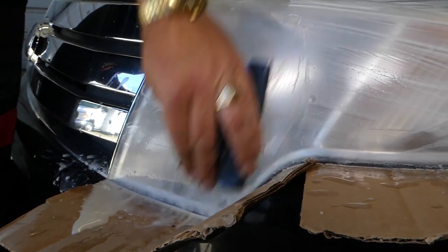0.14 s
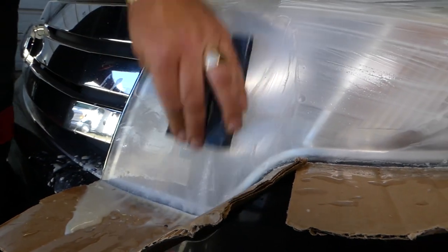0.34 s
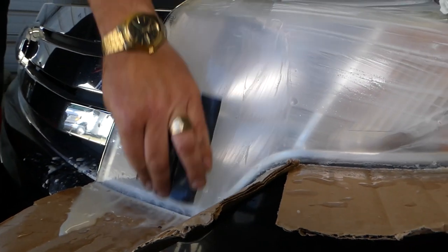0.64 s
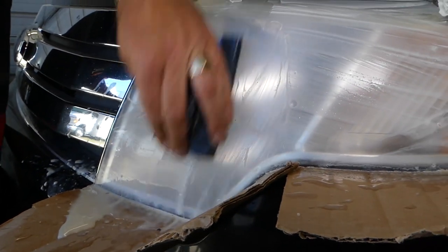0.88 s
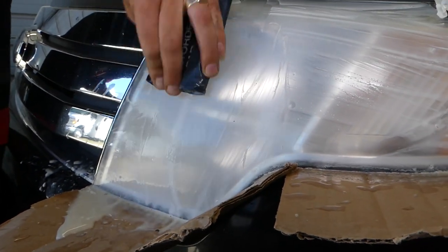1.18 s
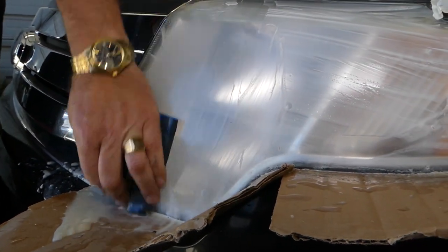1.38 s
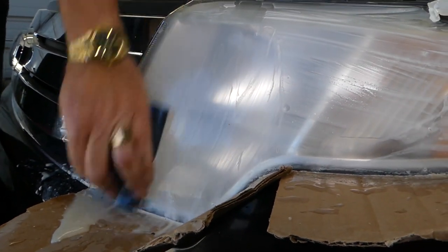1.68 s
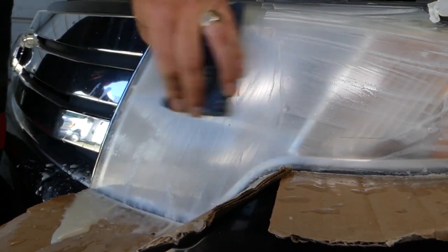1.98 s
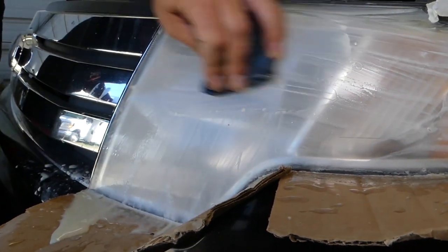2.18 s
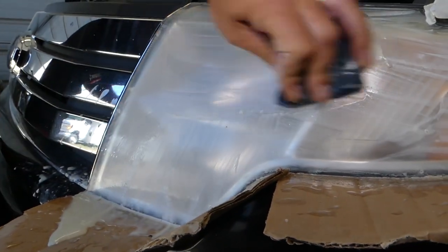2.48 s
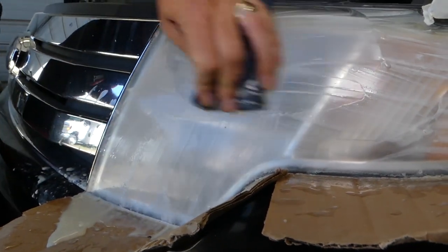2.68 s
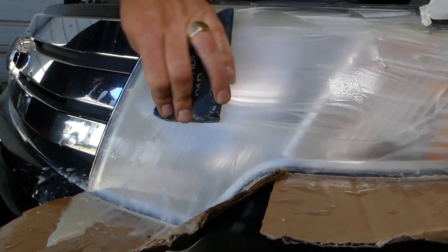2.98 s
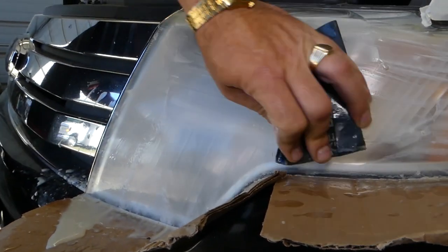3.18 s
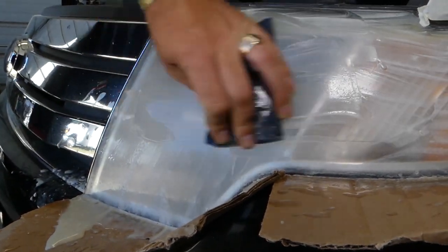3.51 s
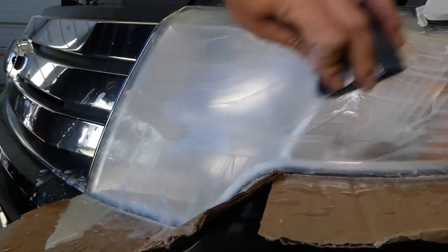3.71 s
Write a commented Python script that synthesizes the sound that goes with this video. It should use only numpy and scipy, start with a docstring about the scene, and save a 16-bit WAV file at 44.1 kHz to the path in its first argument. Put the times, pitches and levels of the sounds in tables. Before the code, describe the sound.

Wet sandpaper rubs a hollow plastic headlamp lens from the start, about five bright, gritty strokes a second, each dipping at the turn. Soft low knocks mark some grips, strongest near 1.7 s; hollow clucks and coarse scrapes come around 1.45 and 1.8 s. A longer stroke spans 1.8-2.2 s, a rough squeak falls at 2.4-2.5 s, and rubbing eases from 3.7 s, stopping near 3.9 s. Close, small workshop, faint steady noise.

```python
"""Wet sanding of a hollow lens

Wet sandpaper is rubbed to and fro by hand over a hollow plastic headlamp lens, about five strokes a second.
Coloured noise grains rasp and hiss with the speed of the hand and sink at each turn, over the lens's body.
Damped modes knock as the pad grips; grain bursts scrape and gliding sines cluck at the rim, and one rough
sine squeaks. Close microphones in a small workshop add a diffuse tail and a steady noise floor."""
import sys
import numpy as np
from scipy import signal
from scipy.fft import rfft, irfft
from scipy.io import wavfile
from scipy.ndimage import uniform_filter1d

SR = 44100
rng = np.random.default_rng(int(sys.argv[2]) if len(sys.argv) > 2 else 0)


def waveform_to_disk(signal):
    """Save audio, clipped to [-1, 1], as 16-bit WAV at the path in sys.argv[1]."""
    frames = np.transpose(np.atleast_2d(signal))
    scaled = np.clip(frames, -1, 1) * 32767
    samples = np.round(scaled).astype(np.int16)
    wavfile.write(sys.argv[1], SR, samples)


N = 169785
T = np.arange(N) / SR  # time [s]
HZ = np.fft.rfftfreq(N, 1 / SR)  # frequency of each spectral bin [Hz]
ONSET_RISE_S = 0.0023  # time constant with which knocks and bites build up


def amp(db):
    """Level to amplitude: 20 dB is a factor of ten."""
    return 10 ** (np.asarray(db) / 20)


def unit(x):
    """Normalisation to a root-mean-square value of 1."""
    return x / np.sqrt(np.mean(x ** 2) + 1e-20)


def read(points):
    """Interpolation of a table over logarithmic frequency, at every bin."""
    f, value = np.transpose(points)
    return np.interp(np.log(HZ + 1), np.log(f + 1), value)


def over_time(points):
    """Linear interpolation of a table over time, at every sample."""
    return np.interp(T, *np.transpose(points))


def wander(hz):
    """Low-passed noise: chance variation up to a cutoff frequency, of unit rms."""
    spectrum = rfft(rng.standard_normal(N)) / np.sqrt(1 + (HZ / hz) ** 4)
    return unit(irfft(spectrum, N))


def swell(centre, spread):
    """Gaussian envelope: a smooth rise and fall."""
    return np.exp(-.5 * ((T - centre) / spread) ** 2)


def colour(pair, gain):
    """Filtering and mid-side mixing: two unrelated signals gain a spectrum and a stereo coherence."""
    # likeness of the two microphones: (frequency [Hz], correlation of left and right)
    likeness = [(50, 0.43), (240, 0.51), (500, 0.32), (1000, 0.2), (1700, 0.5), (2300, 0.57), (4000, 0.74),
                (6200, 0.78), (7500, 0.29), (10000, 0.14), (12000, -0.23), (16000, -0.19)]
    same = np.clip(read(likeness), -.98, .98)
    mid, side = rfft(pair) * gain * np.sqrt([1 + same, 1 - same])
    return unit(irfft(np.array([mid + side, mid - side]), N))


def grains(spread_db):
    """Random impulse noise: dense clicks of grit on plastic, their levels spread exponentially in decibels."""
    grains_per_s = 9000
    size = amp(spread_db * np.minimum(rng.exponential(1, (2, N)), 5))
    sign = rng.choice([-1, 1], (2, N))
    struck = rng.random((2, N)) < grains_per_s / SR
    return size * sign * struck


def strokes():
    """Reciprocating motion: yields each stroke's row, its end and the samples it covers."""
    # strokes of the hand, each lasting until the next: (start [s], speed-up [s], slow-down [s],
    # early, middle and late pressure [dB], body [dB], hiss [dB])
    stroke_rows = [(-.079, 0.028, 0.015, 3, -1.5, -2.5, -3, -2.5),
                   (0.134, 0.0095, 0.036, 0, 0, 3.5, 0.5, -0.5),
                   (0.335, 0.014, .027, 3, 0.3, 0.7, -0.5, -4),
                   (0.524, 0.0095, 0.025, 0.5, -0.8, 2.3, 0.4, -0.5),
                   (0.699, 0.024, .045, 1.4, -0.4, 2, -1, -2.5), (0.897, 0.025, .013, 0.8, 0.5, 1, 0, -0.4),
                   (1.079, 0.01, 0.039, 2.4, -1.7, 4.5, 0, -2), (1.274, 0.017, 0.01, 2, 0.5, 1.5, 0, -0.5),
                   (1.454, 0.007, 0.029, 0.8, -1, -0.5, -0.5, -2),
                   (1.656, 0.017, 0.025, 2.5, -2, 4.5, 0, 0.5), (1.833, 0.014, .017, -0.5, -2, 4, -1, -0.5),
                   (2.185, 0.016, 0.008, 0, 2.9, 4, -1.5, -0.3),
                   (2.353, 0.0063, 0.0036, 4, 2.5, 2, -2, -0.4),
                   (2.531, 0.0044, 0.01, -0.5, 1.5, -1.5, 0.5, 0.5),
                   (2.702, 0.019, 0.032, 4.5, 2, 3, 1.5, 0.5), (2.916, 0.0095, 0.011, 2, 1.2, 1.5, -1, 0.1),
                   (3.076, 0.012, 0.016, 3.5, 2, 3, -0.5, -0.5),
                   (3.267, 0.019, 0.019, 1, 0.5, 0.5, -2.1, 0.5), (3.466, 0.013, 0.059, 3, 0.4, 0, -2, 0)]
    last_stop_s = 3.93
    ends = [row[0] for row in stroke_rows[1:]] + [last_stop_s]
    for row, end in zip(stroke_rows, ends):
        yield row, end, (T >= row[0]) & (T < end)


def hand():
    """Kinematics of rubbing: pad speed, the part fast enough to hiss, pressure, and body and hiss gains."""
    # points within a stroke where its pressure is given: (fraction of the stroke)
    press_at = [.15, .5, .85]
    hiss_lag_s, hiss_lead_s = 0.01, 0.0014  # the finest hiss builds later and dies sooner than the rasp
    speed, glide, press, body, hiss = np.zeros((5, N))
    for (start, rise, fall, early, middle, late, body_db, hiss_db), end, now in strokes():
        since, left = T[now] - start, end - T[now]
        rise, fall = max(rise, .005), max(fall, .005)
        speed[now] = np.tanh(since / rise) * np.tanh(left / fall)
        glide[now] = np.tanh(since / (rise + hiss_lag_s)) * np.tanh(left / (fall + hiss_lead_s))
        press[now] = amp(np.interp(since / (end - start), press_at, [early, middle, late]))
        body[now], hiss[now] = amp(body_db), amp(hiss_db)
    # a 9 ms average smooths the steps between strokes
    return speed, glide, *uniform_filter1d(np.array([press, body, hiss]), size=400, axis=1)


def reflected(pair):
    """Comb-like interference: reflections off hand and lens, new with each stroke, alter its colour."""
    echo_s, echo_db = 0.0054, -10  # decay time constant, and energy relative to the direct sound
    t, out = T[:1500], np.zeros((2, N))
    for row, end, now in strokes():
        echo = rng.standard_normal(len(t)) * np.exp(-t / echo_s)
        echo *= amp(echo_db) / np.linalg.norm(echo)
        echo[0] = 1  # direct sound
        out += signal.oaconvolve(pair * now, echo[None], axes=1)[:, :N]
    return out


def rub(spectrum, spread_db):
    """Source-filter principle: grit clicks are coloured by paper and lens."""
    return colour(reflected(grains(spread_db)), amp(read(spectrum)))


def shifting(pair):
    """Time-varying resonance: the paper flexes under the fingers, so colours come and go within a stroke."""
    patch_hz, patch_s, patch_db = 507, 0.053, 1.5  # smoothing of the patches, and their rms depth
    hz, t, z = signal.stft(pair, SR, nperseg=512, noverlap=384)
    across = np.exp(-(2 * (hz[:, None] - hz) / patch_hz) ** 2)
    along = np.exp(-(2 * (t[:, None] - t) / patch_s) ** 2)
    patches = unit(across @ rng.standard_normal(z.shape[1:]) @ along)
    patched = signal.istft(z * amp(patch_db * patches), SR, nperseg=512, noverlap=384)[1]
    return unit(patched[:, :N])


def sanding():
    """Sliding friction: rasp follows speed and pressure, hiss mostly speed; the body sounds through turns."""
    # spectra of rasp, fine hiss, lens body and low boom: (frequency [Hz], relative level [dB])
    grit_spectrum = [(500, -38), (1300, -11.5), (1800, -5.5), (2250, -0.3), (2800, -3.2), (3600, 0.7),
                     (4700, -2.5), (5700, -6.5), (7000, -16), (10000, -19), (16000, -45)]
    hiss_spectrum = [(2500, -24), (4500, -11), (5700, 0.5), (6500, -3), (7400, -9.5), (8400, -8),
                     (9800, -3.5), (11500, -10.5), (15000, -13.5), (16000, -23)]
    body_spectrum = [(200, -13.5), (400, -3.5), (500, -1), (600, 3), (800, -2.5), (1050, -2.5), (1400, 0.5),
                     (1800, -7), (2600, -15.5), (6000, -31)]
    boom_spectrum = [(30, -52), (60, -44), (100, -14.5), (160, -8.5), (190, -4.5), (238, 0.5), (300, -3.5),
                     (420, -6.5), (900, -28)]
    # hollowness of the lens under the pad: (time [s], level [dB])
    hollowness = [(0, -42), (.43, -45.5), (.55, -39.5), (1.2, -40), (1.45, -45), (1.75, -42), (2, -47.5),
                  (2.35, -42.5), (2.9, -45.5), (3.3, -46.5), (3.8, -51.5)]
    grit_db, hiss_db, body_db = -33.5, -35.5, -40
    hiss_power, hiss_press_power, body_power, boom_power = 2, 0.79, 0.43, 0.038  # exponents
    creep = 0.23  # effort left at the turns
    judder_db, judder_hz = 0.3, 70  # rms level variation of everything
    flutter_db, flutter_hz = 1.42, 40  # further variation of body and boom
    # the pad eases off the lens: the body fades fastest, the hiss slowest
    lift_s, lift_rasp_db_per_s, lift_hiss_db_per_s, lift_body_db_per_s = 3.685, 38, 9, 43

    speed, glide, press, body, hiss = hand()
    effort = np.hypot(speed * press, creep)
    hiss_drive = np.hypot(glide, creep) ** hiss_power * press ** hiss_press_power
    lifted = np.maximum(T - lift_s, 0)

    rasp_level = amp(grit_db - lift_rasp_db_per_s * lifted) * effort
    rasp = rasp_level * shifting(rub(grit_spectrum, spread_db=1.5))
    fizz_level = amp(hiss_db - lift_hiss_db_per_s * lifted) * hiss * hiss_drive
    fizz = fizz_level * shifting(rub(hiss_spectrum, spread_db=0.3))
    shell_level = amp(body_db - lift_body_db_per_s * lifted) * body * effort ** body_power
    shell = shell_level * rub(body_spectrum, spread_db=3.0)
    boom_level = amp(over_time(hollowness)) * effort ** boom_power
    boom = boom_level * rub(boom_spectrum, spread_db=2.5)

    flutter = amp(flutter_db * wander(flutter_hz))
    judder = amp(judder_db * wander(judder_hz))
    return judder * (rasp + fizz + (shell + boom) * flutter)


def bites():
    """Breakaway from static friction: a short coarse burst as the grit breaks loose after each turn."""
    # spectrum of the burst: (frequency [Hz], relative level [dB])
    bite_spectrum = [(400, -27), (900, -4), (1500, 7), (2300, 6), (4000, -4.5), (6000, -4), (10000, -35)]
    bite_db, decay_s, delay_s = -34.5, 0.021, .011  # the stroke's early pressure adds to the level
    level = np.zeros(N)
    for row, end, now in strokes():
        start, early_db = row[0], row[3]
        t = np.maximum(T[now] - start - delay_s, 0)
        level[now] = amp(bite_db + early_db) * (1 - np.exp(-t / ONSET_RISE_S)) * np.exp(-t / decay_s)
    return level * rub(bite_spectrum, spread_db=5.0)


def scrapes():
    """Friction noise at an edge: coarse low grains swell where the pad meets a rim or ridge."""
    # passes over an edge: (centre [s], Gaussian spread [s], level [dB])
    edge_passes = [(0.309, 0.019, -34), (1.432, 0.012, -30.5), (1.48, 0.0073, -27), (1.806, 0.013, -32),
                   (1.863, 0.0087, -28.5), (2.59, 0.032, -36), (2.88, 0.016, -38.5), (3.24, 0.023, -35.5)]
    # spectrum of the scrape: (frequency [Hz], relative level [dB])
    scrape_spectrum = [(50, -10), (150, -1), (400, -3), (620, 6), (780, 1), (950, 1.5), (1300, -1.5),
                       (2100, -1.5), (4000, -13), (10000, -39)]
    level = sum(amp(db) * swell(s, spread) for s, spread, db in edge_passes)
    return level * rub(scrape_spectrum, spread_db=5.0)


def rings():
    """Noise-excited resonance: grit rouses passing resonances of the paper, which slide as it flexes."""
    # resonances: (centre [s], Gaussian spread [s], frequency [Hz], glide [Hz/s],
    # full width at half amplitude [Hz], level [dB])
    resonances = [(0.076, 0.018, 6030, -3000, 400, -39), (0.216, 0.016, 3160, 0, 800, -33.5),
                  (0.593, 0.0099, 3570, 0, 700, -33.5), (1.326, 0.023, 2300, -6000, 1100, -36.5),
                  (1.812, .006, 2120, 0, 400, -32), (2.036, 0.025, 5440, 0, 3020, -29.5),
                  (2.044, 0.067, 9700, 0, 3000, -40), (2.116, 0.048, 6500, -2000, 595, -42),
                  (2.312, 0.034, 5840, 8000, 500, -36.5), (2.39, 0.013, 2050, 0, 700, -37),
                  (2.742, 0.019, 5570, 0, 900, -33.5), (2.782, .05, 2350, 0, 700, -39),
                  (3.128, 0.033, 5880, 0, 302.3, -33.5), (3.197, 0.036, 2150, 0, 800, -37),
                  (3.3, 0.018, 1520, 0, 1100, -34), (3.56, 0.035, 2290, 0, 700, -37),
                  (3.564, 0.05, 5800, -2, 400, -36)]
    out = np.zeros((2, N))
    for s, spread, hz, glide, width, db in resonances:
        ring = colour(grains(spread_db=-3), 1 / (1 + (2 * (HZ - hz) / width) ** 2))
        near = abs(T - s) < 4 * spread
        # turning the analytic signal shifts its frequency
        slide = np.exp(1j * np.pi * glide * (T[near] - s) ** 2)
        slid = (signal.hilbert(ring[:, near]) * slide).real
        out[:, near] += amp(db) * swell(s, spread)[near] * slid
    return out


def squeak():
    """Stick-slip oscillation: the paper gives a rough whistle that mostly falls through one stroke."""
    # path of the whistle: (time [s], frequency [Hz], level [dB])
    whistle_path = [(2.37, 2940, -48), (2.392, 2760, -33), (2.408, 2497, -35), (2.425, 2430, -31.5),
                    (2.447, 2410, -40.5), (2.465, 2275, -40), (2.485, 2177, -45), (2.508, 2220, -32),
                    (2.522, 2360, -34), (2.535, 2320, -55)]
    jitter_hz, jitter_rate_hz = 70, 220  # rms frequency variation, and its cutoff
    rough_db, rough_hz = 3, 120  # rms level variation, and its cutoff
    s, hz, db = np.transpose(whistle_path)
    turns = np.cumsum(np.interp(T, s, hz) + jitter_hz * wander(jitter_rate_hz)) / SR
    level = amp(np.interp(T, s, db)) * (T > s[0]) * (T < s[-1])
    whistle = amp(rough_db * wander(rough_hz)) * np.sin(2 * np.pi * turns)
    return level * unit(whistle)


def knocks():
    """Modal vibration: soft blows as the pad grips set off the damped modes of the lens."""
    # grips of the pad: (time [s], level [dB])
    grips = [(0.142, -24.5), (.532, -24), (0.704, -29), (.909, -20.5), (1.284, -23.5), (1.426, -23),
             (1.665, -16.5), (1.808, -31.5), (2.37, -29), (2.714, -29), (2.934, -30.5)]
    # modes of the lens: (nominal frequency [Hz], relative level [dB], 60 dB decay time [s])
    lens_modes = [(170, -13, 0.13), (242, 2.2, 0.059), (303, -6.5, 0.037), (574, -17, 0.065),
                  (890, -32, 0.098), (1080, -27, 0.07)]
    detune = 0.043  # greatest chance shift of a mode, as a fraction of its frequency
    out = np.zeros(N)
    for s, level_db in grips:
        first = round(s * SR)
        t = T[:min(8000, N - first)]
        ring = np.zeros(len(t))
        for hz, db, t60 in lens_modes:
            mode_hz = hz * (1 + detune * (2 * rng.random() - 1))
            ring += amp(db - 60 * t / t60) * np.sin(2 * np.pi * mode_hz * t)
        out[first:][:len(t)] += amp(level_db) * ring * (1 - np.exp(-t / ONSET_RISE_S))
    return out


def clucks():
    """Gliding resonance: short hollow bumps whose pitch drops as the wet pad rides over the rim."""
    # bumps over the rim: (time [s], first frequency [Hz], frequency approached [Hz], peak level [dB])
    bumps = [(1.423, 1070, 330, -38), (1.477, 1005, 448, -32), (1.795, 1010, 332, -29),
             (1.854, 1220, 600, -42)]
    fall_s, peak_s = 0.0092, 0.0052  # time constant of the pitch fall, and time to the loudest point
    out = np.zeros(N)
    for s, first_hz, last_hz, db in bumps:
        t = np.maximum(T - s, 0)
        # integral of an exponentially falling frequency
        turns = last_hz * t + (first_hz - last_hz) * fall_s * (1 - np.exp(-t / fall_s))
        envelope = (t / peak_s * np.exp(1 - t / peak_s)) ** 2
        out += amp(db) * envelope * np.sin(2 * np.pi * turns)
    return out


def room(x):
    """Diffuse reverberation: a short decaying noise tail, different at each microphone."""
    t60_s, gap_s = 0.45, .005  # 60 dB decay time, and silence before the tail
    t = T[:SR // 2]
    tail = rng.standard_normal((2, len(t))) * amp(-60 * t / t60_s) * (t > gap_s)
    return signal.fftconvolve(x, tail / np.linalg.norm(tail[0]), axes=1)[:, :N]


def workshop():
    """Stationary background noise: the steady floor of the workshop."""
    # spectrum of the floor: (frequency [Hz], relative level [dB])
    floor_spectrum = [(20, -30), (40, -35), (60, -7.5), (110, -7), (250, -12), (600, -17.5), (2000, -15),
                      (6000, -17.5), (16000, -23)]
    floor_db = -43.5
    return amp(floor_db) * colour(rng.standard_normal((2, N)), amp(read(floor_spectrum)))


def scene():
    """Superposition: panned sanding and central lens blows, with their room and the workshop floor."""
    # the hand moves across the microphones: (time [s], left minus right [dB])
    hand_path = [(0, 0.5), (1.7, 1.5), (2.2, 0), (2.6, 0.3), (3.2, 0), (3.8, 0)]
    room_db = -11
    pan_db = over_time(hand_path)
    rubbing = sanding() + bites() + scrapes() + rings() + squeak()
    near = rubbing * amp([pan_db / 2, -pan_db / 2]) + knocks() + clucks()
    return near + amp(room_db) * room(near) + workshop()


def record(dry):
    """Band limitation: a high-pass cuts the bass and a linear-phase low-pass cuts the top."""
    low_cut_hz, edge_hz = 55, 15850
    bass_cut = signal.butter(2, low_cut_hz, "highpass", fs=SR, output="sos")
    thin = signal.sosfilt(bass_cut, dry)
    top_cut = signal.firwin(511, edge_hz, window=("kaiser", 9), fs=SR)
    return signal.oaconvolve(thin, top_cut[None], "same")


dry = scene()
out = record(dry)
waveform_to_disk(out)
```